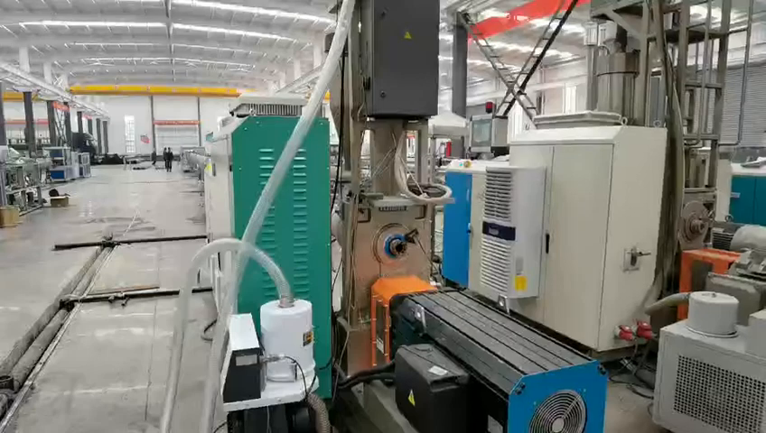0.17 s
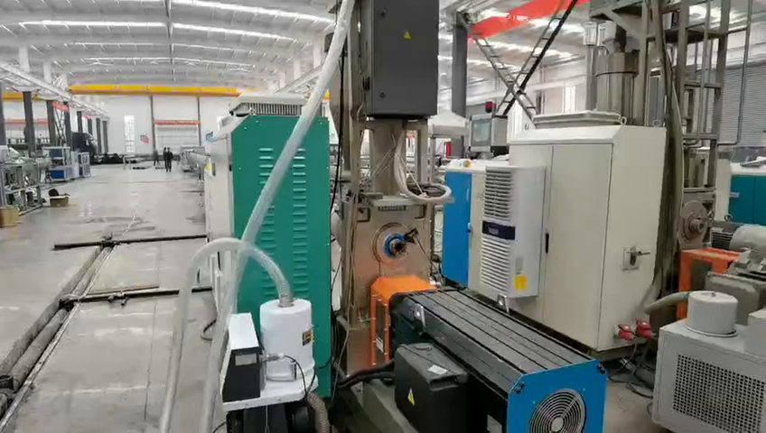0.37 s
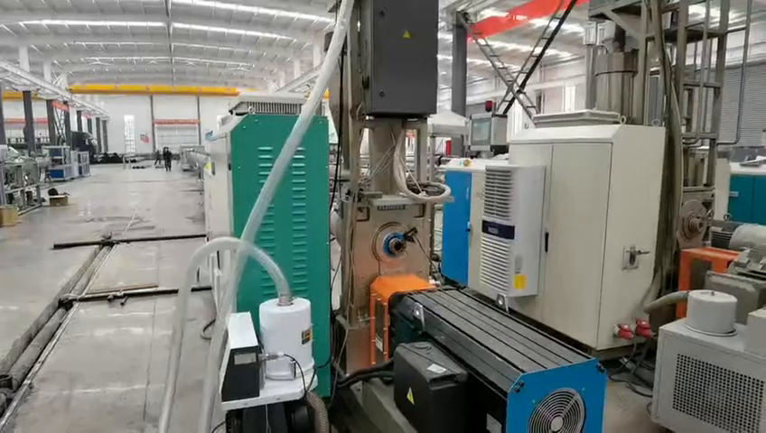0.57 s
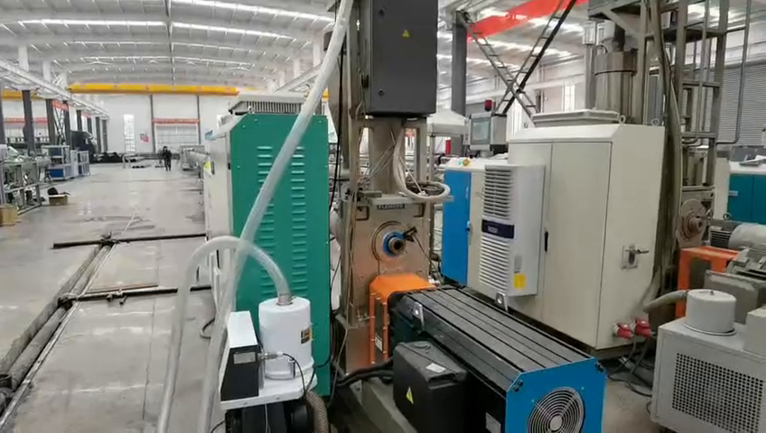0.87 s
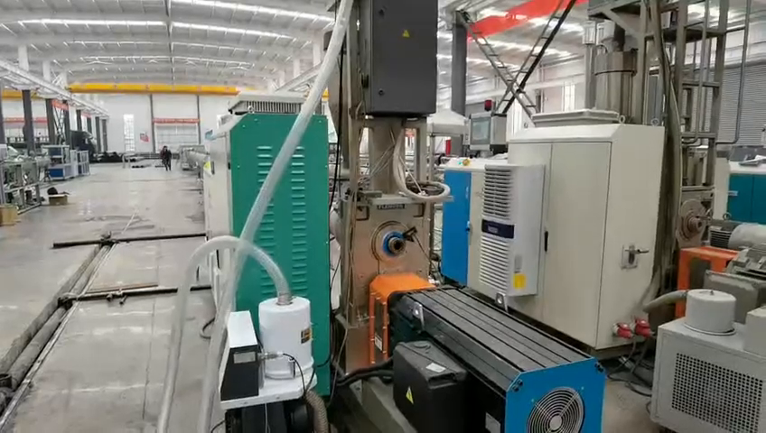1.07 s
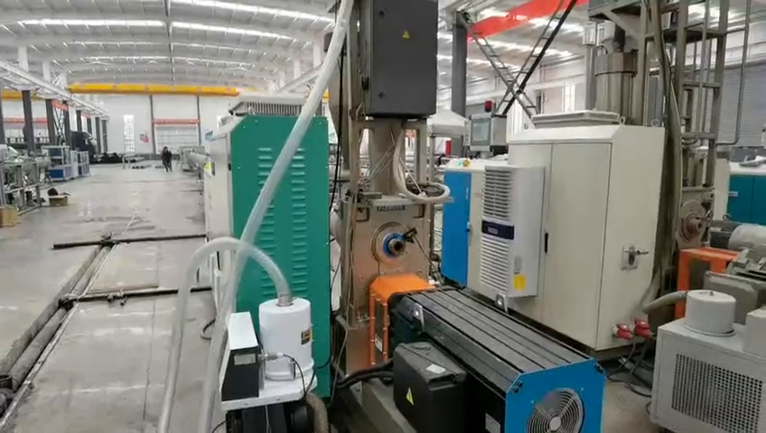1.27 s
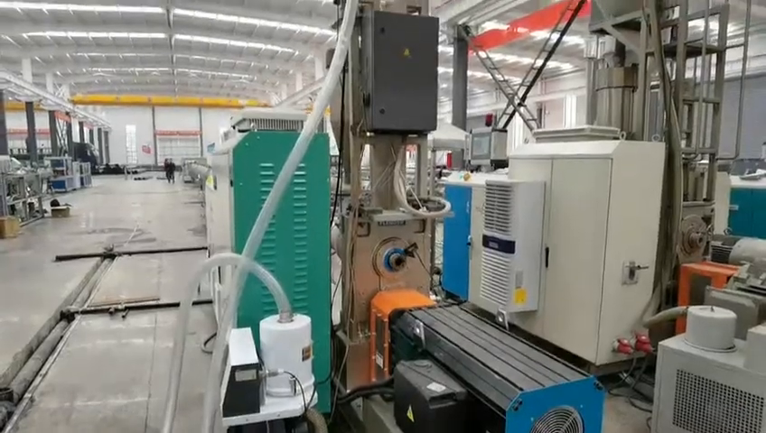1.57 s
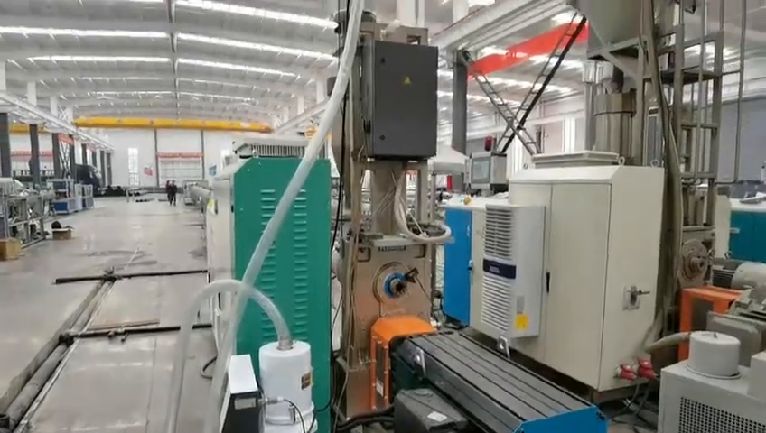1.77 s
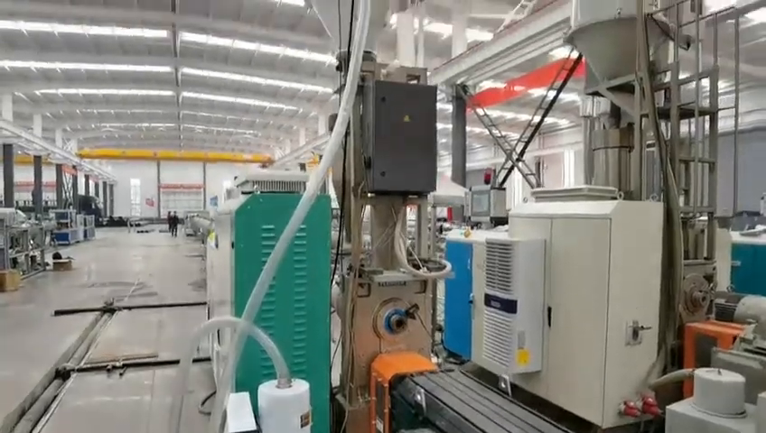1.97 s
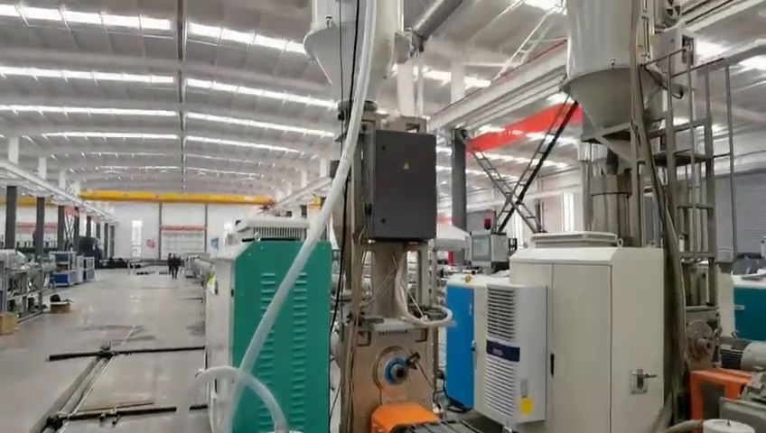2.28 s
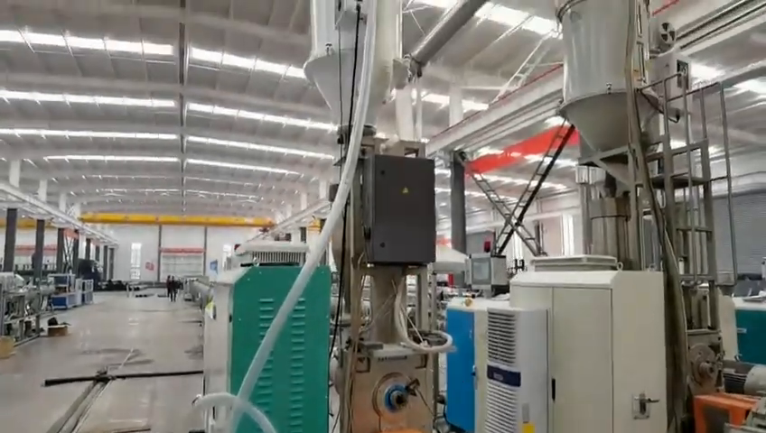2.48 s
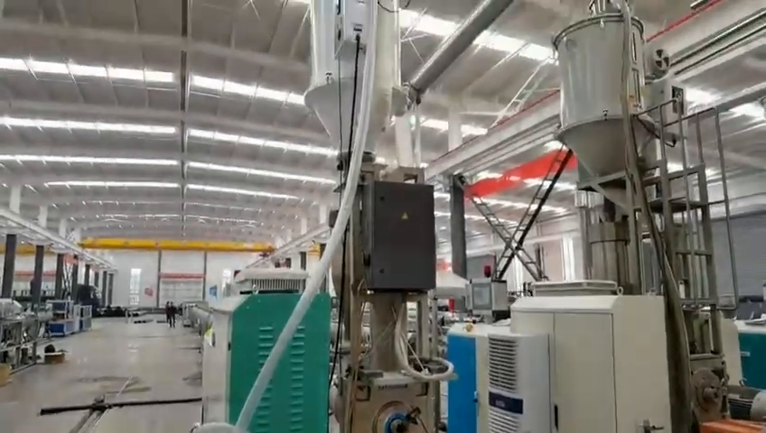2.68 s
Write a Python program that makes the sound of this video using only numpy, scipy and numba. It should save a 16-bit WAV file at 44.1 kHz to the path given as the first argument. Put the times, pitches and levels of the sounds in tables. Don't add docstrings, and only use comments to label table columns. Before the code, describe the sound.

Loud steady industrial machine drone, piercing high motor whines over low rumble and rushing cooling fans

```python
import sys
import numpy as np
from scipy import signal
from scipy.fft import rfft, irfft, next_fast_len
from scipy.io import wavfile
from scipy.ndimage import uniform_filter1d, map_coordinates
from numba import njit

SR = 44100
rng = np.random.default_rng(int(sys.argv[2]) if len(sys.argv) > 2 else 0)


def ratio_of_db(decibels):
    return 10 ** (np.asarray(decibels, float) / 20)


def persist_wave(psi):
    counts = np.round(np.clip(psi, -1, 1) * 32767).astype(np.int16)
    wavfile.write(sys.argv[1], SR, np.atleast_2d(counts).T)


N = 125244
STEP = 64

SCREW_SWITCH_HZ, SCREW_SUPPLY_HZ, SCREW_SLOT_HZ = 1999.75, 35.17, 766.6
PULL_SWITCH_HZ, PULL_SHAFT_HZ = 4999.5, 21.45


def unit(x):
    return x / np.sqrt(np.mean(x ** 2) + 1e-20)


def along(points, hz):
    f, v = np.transpose(points)
    return np.interp(np.log(hz + 1), np.log(f + 1), v)


def control_times():
    return np.arange(N // STEP + 2) * STEP / SR


def wobble(rate_hz, count=1):
    knots = rng.standard_normal((count, 400))
    place = control_times() * rate_hz
    return np.array([map_coordinates(k, [place]) for k in knots])


def tilt(t):
    tilt_s = [
        1.45,
        2.36,
    ]
    return np.interp(t, tilt_s, [0, 1])


def filtered(x, response):
    m = next_fast_len(N + SR // 2)
    return irfft(rfft(x, m) * response(np.fft.rfftfreq(m, 1 / SR)), m)[..., :N]


def rush(spectrum, patchy_db):
    # (frequency [Hz], left-right correlation)
    alike = [(60, .95), (300, .94), (700, .72), (1400, .45), (3000, .22), (8000, .2), (15000, .05)]
    # (frequency [Hz], left over right [dB])
    left_db = [(60, 1), (150, 3), (380, 4), (950, 6.0), (2380, 7.5), (5980, -0.5), (15000, 21)]
    lag_s = 0.000331

    z = signal.stft(rng.standard_normal((2, N)), nperseg=512)[2]
    field = rng.standard_normal(z.shape[1:])
    field = uniform_filter1d(uniform_filter1d(field, size=5, axis=0), size=12, axis=1)
    pair = signal.istft(z * ratio_of_db(patchy_db * unit(field)), nperseg=512)[1][:, :N]
    closed = [(spectrum[0][0] * .7, -90)] + list(spectrum) + [(spectrum[-1][0] * 1.15, -90)]

    def common_and_difference(hz):
        angle = np.arccos(np.clip(along(alike, hz), -1, 1)) / 2
        return ratio_of_db(along(closed, hz)) * [np.cos(angle), np.sin(angle)]

    def ports(hz):
        half = ratio_of_db(along(left_db, hz) / 2) * np.exp(-1j * np.pi * hz * lag_s)
        return half ** np.array([[1], [-1]])

    a, b = filtered(pair, common_and_difference)
    return unit(filtered(np.array([a + b, a - b]), ports))


@njit
def oscillators(turn, gains, step, size):
    out = np.zeros((2, size))
    for k in range(len(turn)):
        z = 1 + 0j
        for i in range(size):
            j, u = i // step, (i % step) / step
            for c in range(2):
                gain = gains[k, c, j] + u * (gains[k, c, j + 1] - gains[k, c, j])
                out[c, i] += (z * gain).real
            z *= turn[k]
    return out


def tones(hz, rows, swell_db=0):
    side_turn_rad, drift_turns = 0.72, 0.05
    sway_db, sway_hz, moving_sway = .8, 4, .6
    flutter_db, flutter_hz = 1.3, 22
    count = len(hz)
    up = tilt(control_times())
    level_db, side_db, change_db = np.transpose(rows)[:, :, None]
    curves = wobble(sway_hz, 3 * count).reshape(3, count, -1)
    mid_sway, side_sway, drift = curves * (1 + moving_sway * up)
    flicker_db = flutter_db * (up + 1 / 3) * wobble(flutter_hz, count)
    phase_turns = rng.random((count, 1)) + drift_turns * drift
    gain = np.sqrt(2) * ratio_of_db(level_db + change_db * up + swell_db + flicker_db)
    gain = gain * np.exp(2j * np.pi * phase_turns)
    mid = gain * ratio_of_db(sway_db * mid_sway)
    side = gain * ratio_of_db(side_db + sway_db * side_sway) * np.exp(-1j * side_turn_rad)
    ports = np.stack([mid + side, mid - side], 1)
    return oscillators(np.exp(2j * np.pi * hz / SR), ports, STEP, N)


def motor(table, switch_hz, step_hz, start_hz=0):
    table = np.array(table)
    hz = abs(start_hz + table[:, 0] * switch_hz + table[:, 1] * step_hz)
    return tones(hz, table[:, 2:])


def screw_motor():
    # (switching multiple, supply multiple, level [dB], side over mid [dB],
    # change on tilt [dB])
    switching = [(1.0, -3.0, -36.1, -4.1, -4.7), (1.0, -1.0, -36.7, 4.4, -5.6),
                 (1.0, 3.0, -40.2, -0.7, 5.5), (1.0, 5.0, -33.2, -1.9, -9.0), (1.0, 7.0, -49.1, -4.6, 3.5),
                 (2.0, 2.0, -45.9, -3.3, -4.3), (3.0, -3.0, -42.0, -2.2, -5.8),
                 (3.0, 1.0, -45.5, -3.6, 3.9), (3.0, 5.0, -42.4, -10.2, 1.0), (4.0, -6.0, -48.5, 1.5, 0.7),
                 (4.0, -4.0, -52.8, 2.0, 11.5), (4.0, -2.0, -40.6, 3.1, 4.8), (4.0, 0.0, -32.5, 0.1, -6.0),
                 (4.0, 2.0, -32.7, 3.9, -8.3), (4.0, 8.0, -41.0, 0.2, 2.4)]
    slots = [(0.0, 0.0, -46.5, -0.9, 0.5), (1.0, -3.0, -40.3, -3.5, 4.0), (2.0, -2.0, -50.2, -0.1, 7.8),
             (2.0, 0.0, -45.4, -1.5, 3.2), (3.0, -3.0, -47.1, -0.7, -0.6), (3.0, -1.0, -48.8, -2.2, 1.4),
             (3.0, 3.0, -45.9, -0.9, 5.1), (4.0, -2.0, -45.5, 4.2, -0.5), (4.0, 0.0, -45.4, -3.5, 5.7)]
    return (motor(switching, SCREW_SWITCH_HZ, SCREW_SUPPLY_HZ)
            + motor(slots, SCREW_SWITCH_HZ, SCREW_SUPPLY_HZ, SCREW_SLOT_HZ))


def screw_carrier():
    # (time [s], level [dB])
    swell = [
        (.3, -43),
        (.7, -39),
        (1.1, -41),
        (1.5, -49),
        (2.1, -48),
        (2.4, -39),
        (2.6, -35.5),
        (2.8, -35),
    ]
    swell_db = np.interp(control_times(), *np.transpose(swell))
    return tones(np.array([2 * SCREW_SWITCH_HZ]), [(0, 2.5, 0)], swell_db)


def puller_motor():
    # (switching multiple, shaft multiple, level [dB], side over mid [dB], change on tilt [dB])
    lines = [(1.0, -18.0, -42.9, 0.4, 5.6), (1.0, -6.0, -37.9, -4.7, -8.9), (1.0, 16.0, -46.2, -1.2, -8.3),
             (2.0, -12.0, -43.0, -1.1, -6.1), (2.0, -2.0, -43.6, -1.4, 0.4), (2.0, 0.0, -33.7, 1.3, -3.4),
             (2.0, 2.0, -52.6, -0.9, 16.0), (2.0, 12.0, -44.1, -3.0, -2.0)]
    return motor(lines, PULL_SWITCH_HZ, PULL_SHAFT_HZ)


def puller_whine():
    # (time [s], level [dB])
    swell = [
        (.3, -31.5),
        (.86, -31),
        (1.3, -28.3),
        (1.8, -28.5),
        (1.95, -32.5),
        (2.45, -33.5),
        (2.8, -38),
    ]
    t = control_times()
    beat_db = 20 * np.log10(1 + .27 * np.sin(2 * np.pi * PULL_SHAFT_HZ * t))
    hz = np.array([PULL_SWITCH_HZ + 18 * PULL_SHAFT_HZ])
    return tones(hz, [(0, -3, 0)], np.interp(t, *np.transpose(swell)) + beat_db)


def gearbox():
    # (mesh multiple, level [dB], side over mid [dB], change on tilt [dB])
    gears = np.array([(1, -39.7, -5.9, 2.0), (2, -44.8, -1.6, 1.3), (3, -42.7, -5.9, -1.4),
                      (4, -43.0, -5.9, -6.7), (5, -43.4, 2.7, -5.7), (6, -48.6, 1.2, -5.9),
                      (7, -42.6, -0.5, 1.6)])
    mesh_hz = 609.15
    return tones(gears[:, 0] * mesh_hz, gears[:, 1:])


def pumps_and_fans():
    # (frequency [Hz], level [dB], side over mid [dB], change on tilt [dB])
    pumps = np.array([(278.7, -38.8, -12.4, 1.9), (300.0, -42.0, -11.0, 0.0), (348.1, -43.0, -17.8, 4.5),
                      (397.9, -33.2, -8.1, -1.4), (514.6, -42.5, -9.8, 7.5), (620.1, -41.5, -7.2, 1.5),
                      (796.1, -43.6, -2.5, -2.1), (814.4, -47.0, -2.0, 0.0), (974.0, -40.2, -1.7, -9.0),
                      (1028.8, -44.9, -6.7, -2.5), (1191.8, -53.0, 2.8, 5.1), (1246.2, -50.4, 3.7, -0.9),
                      (1543.4, -46.4, -1.3, -3.1), (1592.1, -48.8, 3.2, -5.2), (5153.9, -52.2, 4.2, 4.2),
                      (5653.8, -42.9, -1.6, -5.6), (8089.8, -42.2, -0.8, -0.6), (11719.0, -56.0, 0.0, -2.0),
                      (12225.0, -57.0, 0.0, 0.0)])
    return tones(pumps[:, 0], pumps[:, 1:])


def faint_sidebands():
    # (frequency [Hz], level [dB], side over mid [dB], change on tilt [dB])
    faint = np.array([(1305.3, -50.0, 4.8, -10.0), (1392.3, -53.3, 2.4, 4.5), (1522.0, -50.4, -0.2, -10.0),
                      (2035.1, -46.3, 5.0, -10.0), (3089.2, -60.1, 4.1, 6.9), (3160.3, -54.1, 3.5, 9.3),
                      (3393.5, -51.1, -1.7, 0.3), (3865.7, -47.7, 0.4, -7.6), (3929.8, -46.2, 0.9, -4.4),
                      (3979.9, -46.6, -4.6, -9.2), (4134.2, -48.8, 5.0, -8.6), (4571.1, -57.0, -8.0, 8.0),
                      (4839.4, -49.3, 1.5, -1.5), (5251.6, -52.0, -8.0, -0.2), (5520.1, -45.4, 3.1, -10.0),
                      (5788.2, -49.8, -2.1, 0.6), (5964.7, -45.2, 1.5, -10.0), (6105.3, -45.2, -5.2, -8.6),
                      (7233.1, -63.8, -1.2, 10.0), (7303.3, -45.1, -4.4, -3.4), (7910.8, -43.6, 0.1, -9.5),
                      (8696.0, -49.2, 5.0, 5.6), (8765.5, -46.5, -4.5, 4.9), (8885.3, -53.8, 3.8, 3.7),
                      (9340.7, -49.8, -1.2, -10.0), (9473.4, -53.0, -1.4, 4.5), (9774.6, -46.0, -3.6, -2.6),
                      (10133.2, -54.7, 2.4, 7.6), (10310.9, -52.6, -2.0, -0.2), (10402.6, -48.8, -0.1, 1.6),
                      (10445.3, -51.4, -0.1, -5.7), (10579.4, -54.6, 0.0, 1.5)])
    return tones(faint[:, 0], faint[:, 1:])


def far_machines(count=220):
    # (frequency [Hz], level [dB])
    far_levels = [(250, -51), (1000, -58), (3000, -56), (8000, -54), (11000, -60)]
    spread, side, change = rng.standard_normal((3, count))
    hz = 250 + 10700 * rng.random(count) ** 1.4
    level_db = along(far_levels, hz) + 2.5 * spread
    side_db = -9 * (hz < 700) + 2.5 * side
    return tones(hz, np.c_[level_db, side_db, 2.5 * change])


def slow_gain(level_db, tilt_db):
    sway_db = 0.96 * wobble(3.98)[0].repeat(STEP)[:N]
    return ratio_of_db(level_db + tilt_db * tilt(np.arange(N) / SR) + sway_db)


def throb():
    return 1 + .18 * np.sin(2 * np.pi * 2 * SCREW_SUPPLY_HZ * np.arange(N) / SR)


def line_rumble():
    # (frequency [Hz], density [dB per Hz])
    spectrum = [(30, -18), (44, -10.5), (130, 0), (180, -1.5), (208, 1), (250, -4), (620, -12.5),
                (1500, -29.5)]
    return slow_gain(-25, tilt_db=2.2) * rush(spectrum, patchy_db=1.5)


def fan_rush():
    # (frequency [Hz], density [dB per Hz])
    spectrum = [(500, -38), (900, -5.5), (1650, -5.5), (2050, -1), (3000, -5.5), (3600, -8.5), (4300, -3.5),
                (7500, -5)]
    return slow_gain(-23.5, tilt_db=-1.2) * throb() * rush(spectrum, patchy_db=1.46)


def casing_hiss():
    # (frequency [Hz], density [dB per Hz])
    spectrum = [(7000, -44), (7550, -10), (8000, 4), (8700, -7), (9100, -9.5), (10200, -12.5),
                (10900, -19.5), (11500, -24)]
    return slow_gain(-23, tilt_db=-0.5) * throb() * rush(spectrum, patchy_db=1)


def leaking_air():
    # (frequency [Hz], density [dB per Hz])
    spectrum = [(11000, -6), (11800, 1), (12300, -0.5), (12700, -7), (13600, -4.5), (14800, -6),
                (15700, -3)]
    return ratio_of_db(-38.5) * rush(spectrum, patchy_db=1.7)


def low_swell():
    # (time [s], level [dB])
    swell = [
        (.3, -42),
        (1.4, -42),
        (1.52, -31.5),
        (1.72, -28.5),
        (1.85, -45),
        (2.2, -44),
        (2.8, -42),
    ]
    swell_db = np.interp(control_times(), *np.transpose(swell))
    return tones(np.array([207]), [(0, -18, 0)], swell_db)


def suction_lines():
    # (frequency [Hz], density [dB per Hz])
    spectrum = [(2400, -10), (2900, -1.5), (3500, -1), (3900, -10)]
    return ratio_of_db(-38) * np.sqrt(tilt(np.arange(N) / SR)) * rush(spectrum, patchy_db=1.5)


def scene():
    drives = screw_motor() + screw_carrier() + puller_motor() + puller_whine()
    machines = gearbox() + pumps_and_fans() + faint_sidebands() + far_machines()
    noise = line_rumble() + fan_rush() + casing_hiss() + leaking_air()
    return drives + machines + noise + low_swell() + suction_lines()


def thin_spectrum(x, size=1024, band=16):
    # (frequency [Hz], share of band level)
    dead = [(1000, .02), (2000, .25), (3300, .55), (4300, .36), (5400, .45), (7000, .25), (10700, .25),
            (11300, 1.4), (13500, 1.2), (14200, .65)]
    # (frequency [Hz], leaning [sigma])
    holes = [(10700, -4), (11370, .7), (12060, -1.5), (12750, 1.5), (13440, -.1), (14130, -2), (14800, -3),
             (15500, -1.6)]
    wide = 2 * band
    k, n = np.arange(size) + .5, np.arange(2 * size) + .5
    window = np.sqrt(2 / size) * np.sin(np.pi * n / (2 * size))
    basis = window[:, None] * np.cos(np.pi / size * np.outer(n + size / 2, k))
    count = N // size + 2
    padding = ((0, 0), (size, (count + 1) * size - N - size))
    pair = np.pad([x[0] + x[1], x[0] - x[1]], padding) / 2
    c = pair[:, np.arange(count)[:, None] * size + np.arange(2 * size)] @ basis

    hz = k * SR / 2 / size
    level = np.sqrt((c ** 2).reshape(2, count, -1, wide).mean((0, 3))).repeat(wide, 1)
    flicker = rng.standard_normal((count, size // band // 2))
    flicker = unit(uniform_filter1d(flicker, size=2, axis=0)).repeat(wide, 1)
    empty = flicker < along(holes, hz.reshape(-1, wide).mean(1).repeat(wide))
    kept = (abs(c) > along(dead, hz) * level) * ~empty

    frames = (c * kept) @ basis.T
    out = np.pad(frames[:, 1:, :size] + frames[:, :-1, size:], 0).reshape(2, -1)[:, :N]
    return np.array([out[0] + out[1], out[0] - out[1]])


def roll_off(x):
    return signal.sosfilt(signal.butter(12, 16840, fs=SR, output="sos"), x)


def record(dry):
    # (time [s], gain [dB])
    fade = [
        (.217, -60),
        (.227, -26),
        (.229, -8),
        (.255, -1),
        (.34, 1.5),
        (.42, 0),
        (1.2, -.7),
        (1.6, 0),
    ]
    # (time [s], gain [dB])
    right_settles = [
        (.22, 4.5),
        (.39, 2.5),
        (.44, 0),
    ]
    top_hz, frame_shift = 15750, 400
    t = np.arange(N) / SR
    both_db = np.interp(t, *np.transpose(fade), left=-200)
    right_db = np.interp(t, *np.transpose(right_settles))
    gain = ratio_of_db(both_db + np.outer([0, 1], right_db))
    early = np.roll(filtered(dry, lambda hz: hz < top_hz), -frame_shift, axis=1)
    mix = np.roll(thin_spectrum(early), frame_shift, axis=1) * gain
    return roll_off(mix)


dry = scene()
out = record(dry)
persist_wave(out)
```